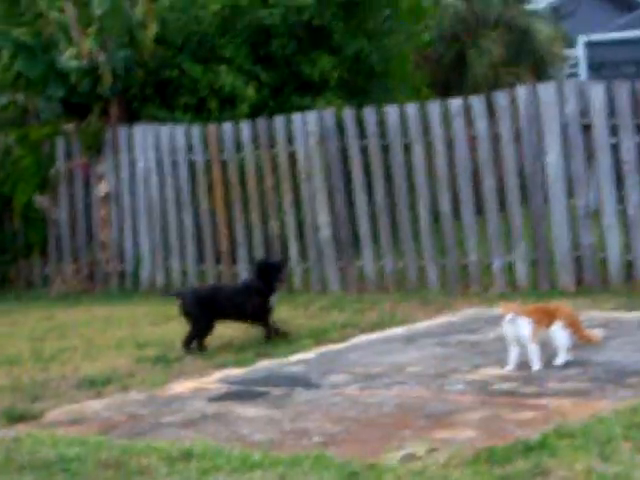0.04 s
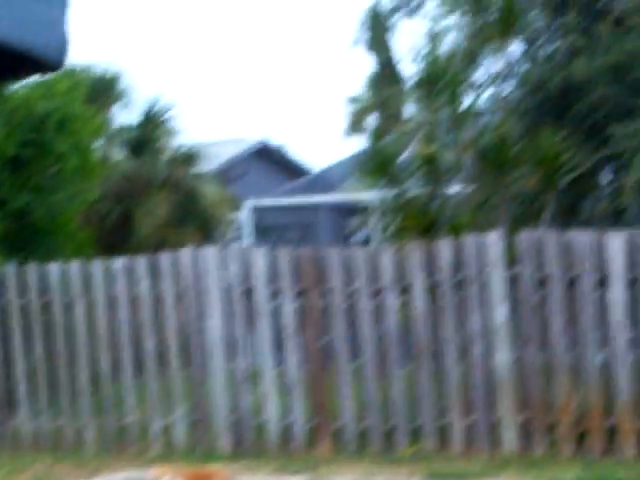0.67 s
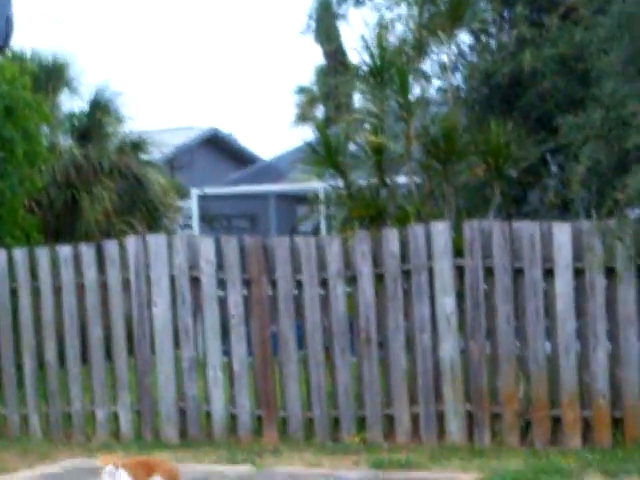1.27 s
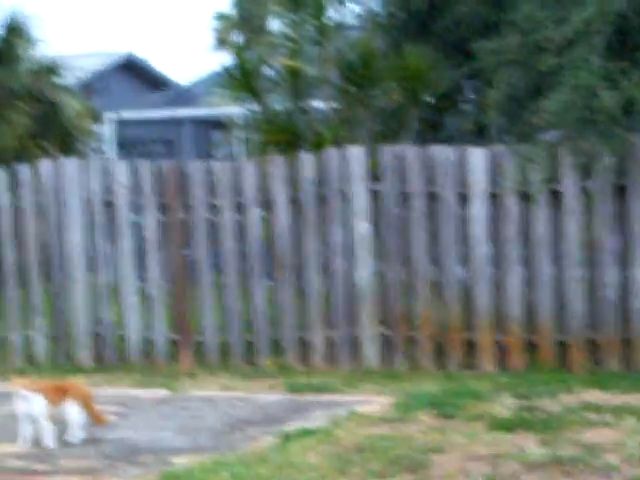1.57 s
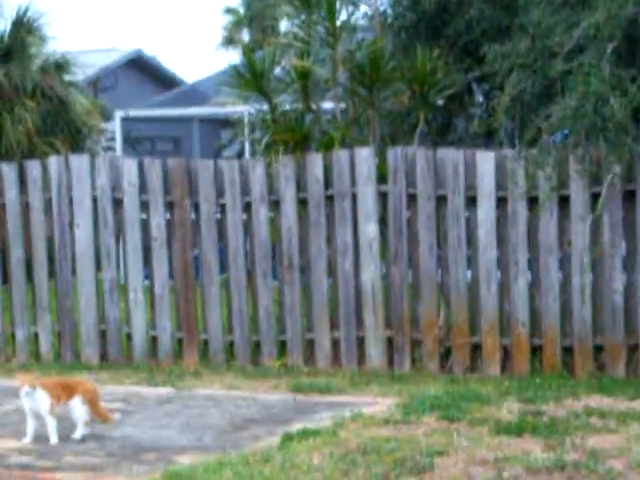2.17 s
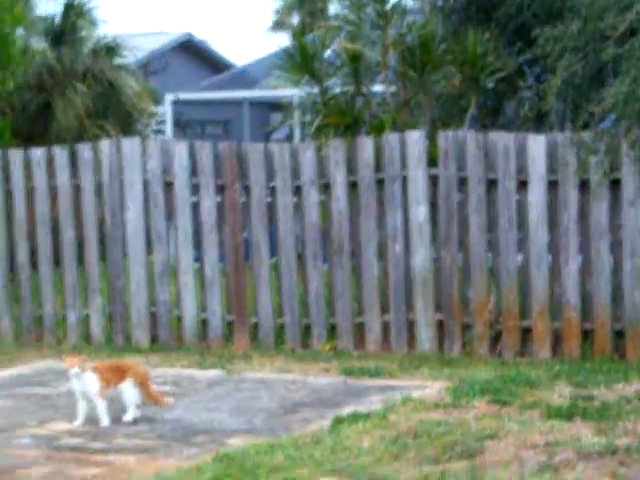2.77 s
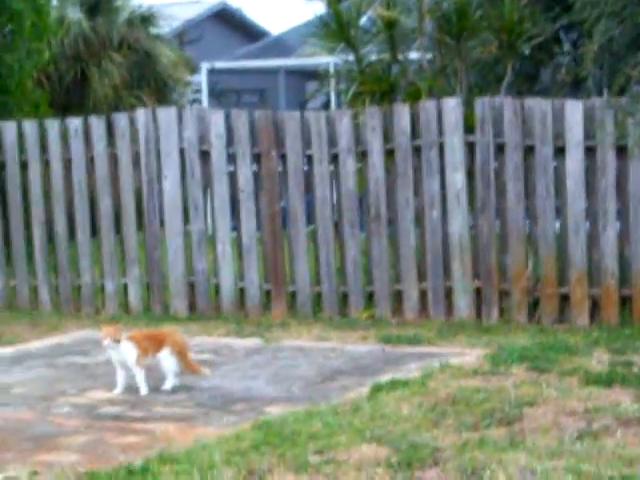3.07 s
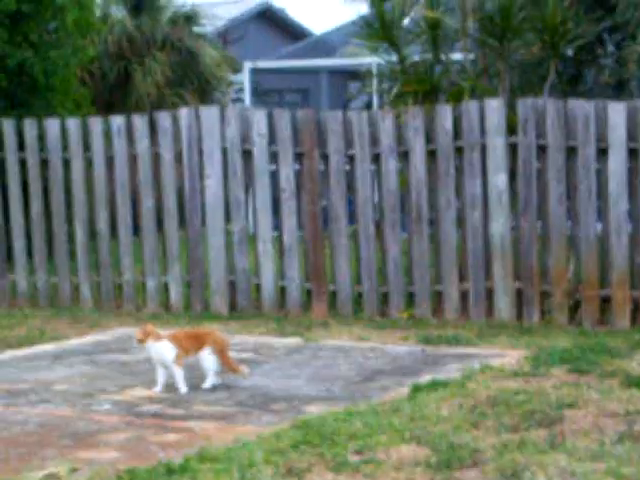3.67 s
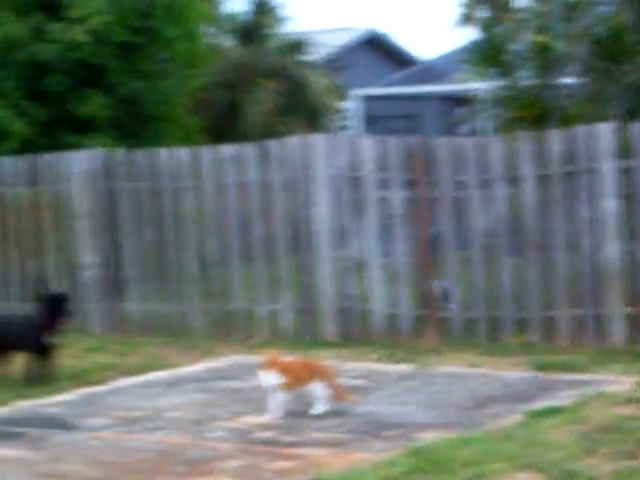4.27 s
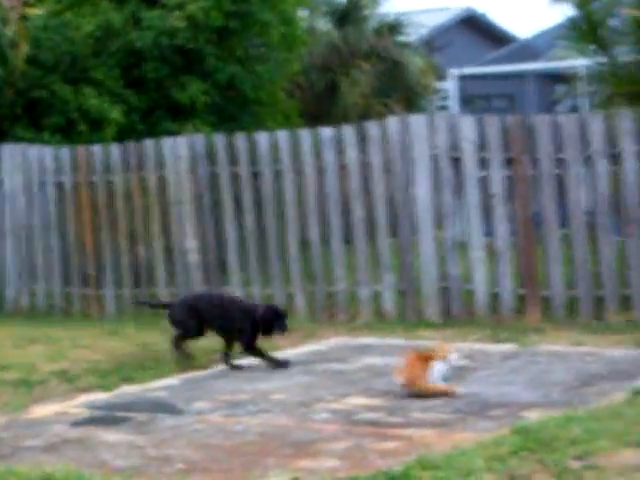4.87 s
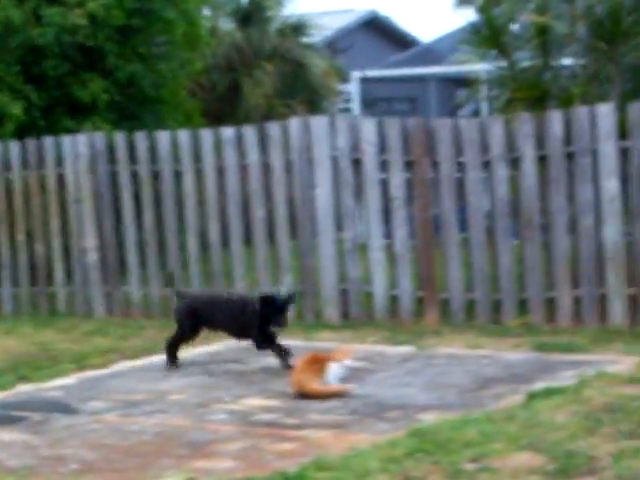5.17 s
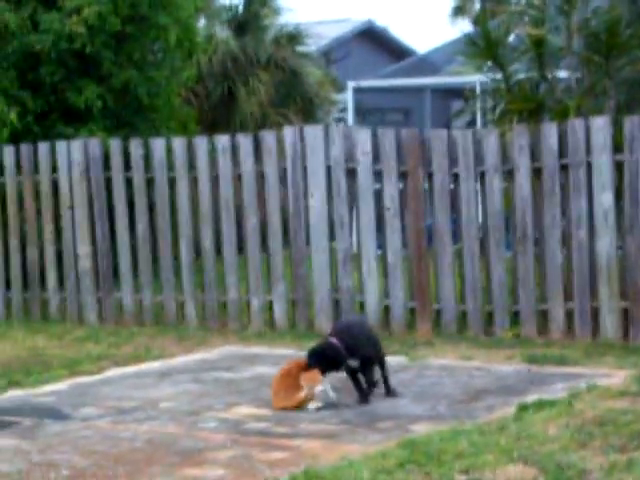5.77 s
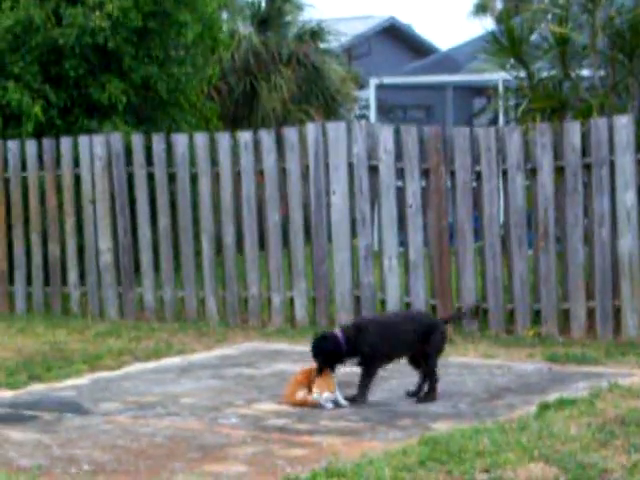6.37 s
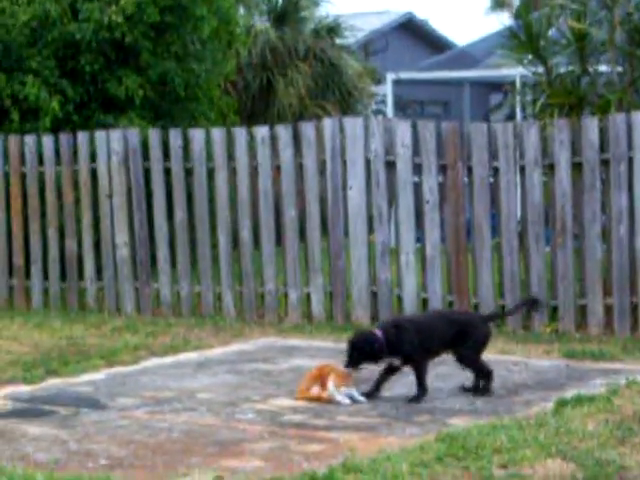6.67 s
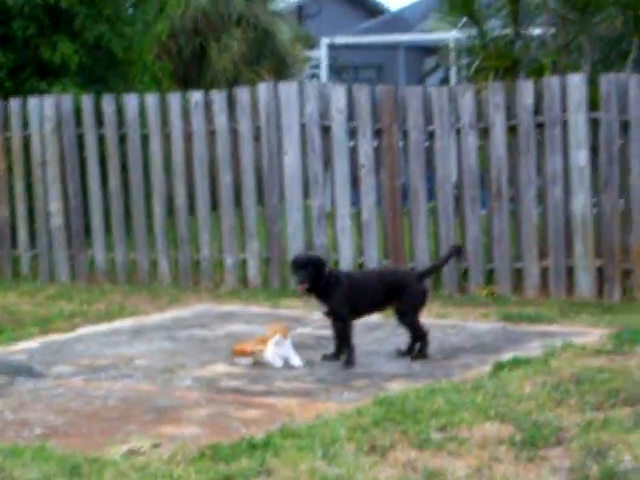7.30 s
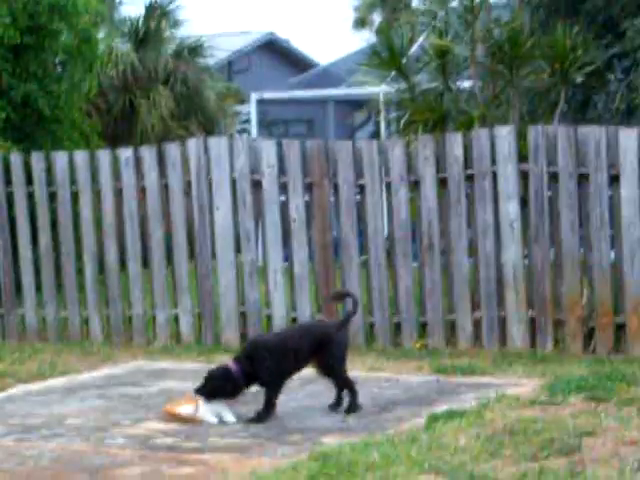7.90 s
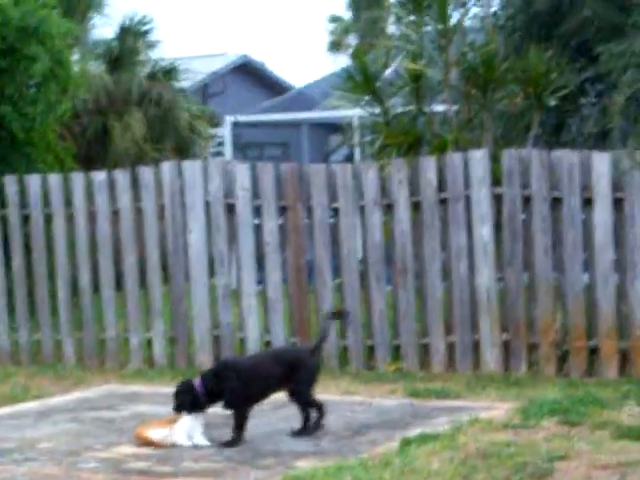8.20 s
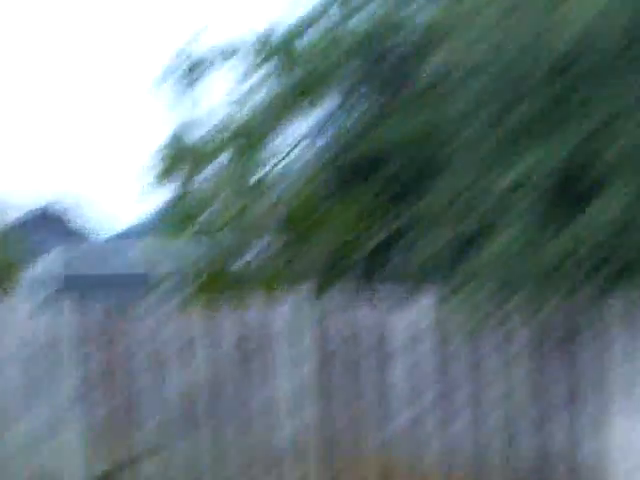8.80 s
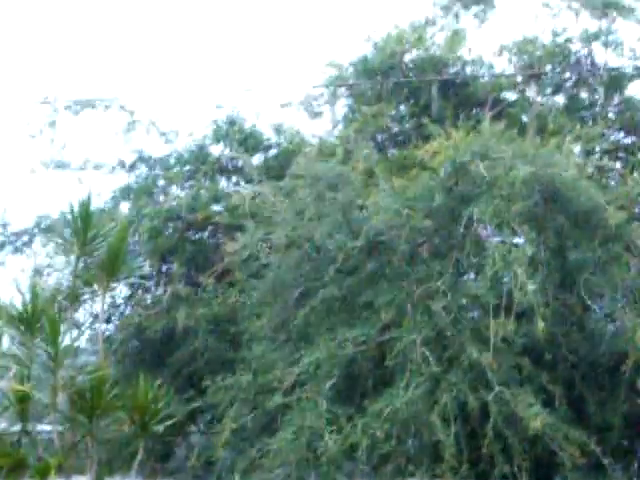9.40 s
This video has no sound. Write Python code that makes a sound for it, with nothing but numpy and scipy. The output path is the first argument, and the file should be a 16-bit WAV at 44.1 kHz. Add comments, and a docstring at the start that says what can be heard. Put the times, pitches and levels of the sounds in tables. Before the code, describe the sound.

In a quiet fenced yard, hoarse, down-slurred jay calls sound one after another, each with a short echo. The hand-held microphone picks up faint dull thumps throughout, with occasional puffs of wind and very brief motor whirrs. Around the middle a distant bird whistles once, very faintly, and a few small dry ticks follow. The jays then call more often, over a steady soft hush.

```python
"""A fenced backyard, heard from a small hand-held camera, with blue jays scolding in the trees around it.
Each jeer is an arched, down-slurred whistle, strongest on its fourth harmonic; most break into a rasp.
Ground, fence and houses throw the calls back over a quiet hush and the hum of a distant fan.
Right at the microphone are puffs of wind, soft thumps and tiny whirrs of the lens motor.
Midway a far bird whistles once, and a few dry ticks follow."""
import sys
import numpy as np
from scipy import signal
from scipy.fft import rfft, irfft, next_fast_len
from scipy.io import wavfile
from scipy.ndimage import map_coordinates

SR = 44100
rng = np.random.default_rng(int(sys.argv[2]) if len(sys.argv) > 2 else 0)


def wav_out(sig):
    """Save sig, one row per channel (or a flat mono array), as 16-bit PCM at SR to the path in sys.argv[1]."""
    wavfile.write(sys.argv[1], SR, np.round(np.clip(np.atleast_2d(sig).T, -1, 1) * 32767).astype(np.int16))


N = 416744
TIME = np.arange(N) / SR


def amp(db):
    """Decibels to gain."""
    return 10 ** (np.asarray(db) / 20)


def ramp(t, start, length):
    """Rises from zero to one over the given length."""
    return np.clip((t - start) / length, 0, 1)


def unit_rms(x):
    """Scales to an rms of one."""
    return x / np.sqrt(np.mean(x ** 2) + 1e-20)


def coloured(x, points):
    """Filters by a spectrum of (Hz, dB) points."""
    hz, db = np.transpose(points)
    size = next_fast_len(len(x))
    bins = np.fft.rfftfreq(size, 1 / SR)
    gain = amp(np.interp(np.log(bins + 1), np.log(hz + 1), db))
    return irfft(rfft(x, size) * gain, size)[:len(x)]


def noise(points, size):
    """Noise of unit rms with the given spectrum."""
    return unit_rms(coloured(rng.standard_normal(size), points))


def wander(t, rate_hz):
    """Smooth random motion of about unit size."""
    knots = rng.standard_normal(4096)
    return map_coordinates(knots, [(t - t[0]) * rate_hz * 2], order=3, mode="wrap")


def phase_of(hz):
    """Running phase in radians of a moving pitch."""
    return 2 * np.pi * np.cumsum(hz) / SR


def add(mix, s, sound):
    """Mixes a sound in at time s; what comes before time zero is dropped."""
    at = round(s * SR)
    sound = sound[max(-at, 0):]
    part = mix[max(at, 0):][:len(sound)]
    part += sound[:len(part)]


def jeer_pitch(t, crest_s, break_s, crest_hz, break_hz, roundness,
               flick_hz=150.4, flick_s=0.00402, scoop_hz=111.7, dive_hz_per_s=600):
    """A flick and a scoop up to the crest, a long slur down, and a dive after the voice breaks."""
    flick = flick_hz * np.exp(-t / flick_s)
    scoop = scoop_hz * (1 - ramp(t, 0, crest_s)) ** (1.85 * roundness ** 2)
    drop_hz, slur_s = crest_hz - break_hz, break_s - crest_s
    slur = drop_hz * ramp(t, crest_s, slur_s) ** roundness
    dive = (dive_hz_per_s + 0.6 * drop_hz / slur_s) * np.maximum(t - break_s, 0)
    return crest_hz - flick - scoop - slur - dive


# The body of a jay's voice, and its shrill top. Each row: harmonic number, relative level in dB.
BODY_HARMONICS = [(1, -40), (2, -23), (3, -18), (4, 0), (5, -24)]
TOP_HARMONICS = [(6, -2), (7, -4.5), (8, -6), (9, -10.5), (10, -14.5), (11, -26)]
# The throat, which damps a narrow band; the hoarse hiss round the top; the closing rasp.
# Each row: frequency in Hz, gain in dB.
THROAT_COLOUR = [(2500, 2.5), (4000, 1.5), (4400, -0.5), (4700, -14.5), (5050, -0.5), (5350, 1.5),
                 (5850, -6), (6400, 3), (7200, -1), (7800, -8)]
HOARSE_COLOUR = [(1200, -18), (2600, -9), (4000, -7.5), (4700, -11.5), (5300, -8), (7200, 8), (8500, -21)]
RASP_COLOUR = [(1200, -37.5), (1500, -13), (2000, -29.5), (2600, -12.5), (2850, -9.5), (3250, -6),
               (3600, -3.5), (4300, -10), (4650, -24.5), (5400, -16.5), (7000, -25), (8500, -30.5)]
def jeer(crest_s, break_s, crest_hz, break_hz, roundness, hold_db, swell_db, overtone_db, rasp_db,
         swell_s=0.096, crack_s=0.036, rasp_s=0.1, rattle_hz=200, attack_s=0.012, cut_s=0.018):
    """One jay in the branches: a hoarse tone swells and holds, then breaks, shakes and rattles."""
    t = np.arange(0, break_s + rasp_s, 1 / SR)
    hz = jeer_pitch(t, crest_s, break_s, crest_hz, break_hz, roundness)
    broken = ramp(t, break_s - crack_s / 2, crack_s)
    release = ramp(t, break_s, rasp_s)
    below_full_db = swell_db * (1 - ramp(t, 0, swell_s))
    body_db = hold_db - below_full_db - 6 * broken - 3.5 * release + 1.38 * wander(t, 45)
    top_db = overtone_db - 0.79 * below_full_db - 4 * release
    rasp_gain = amp(rasp_db) * broken
    roughness = np.minimum(rasp_gain, 1)
    jitter = (0.0026 + 0.0088 * roughness) * wander(t, 250)
    phase = phase_of(hz * (1 + jitter))
    # the voice starts an octave up: the odd harmonics swell in as its period doubles
    doubled = ramp(t, 0, 0.03) ** 2
    tone = amp(top_db - 13) * noise(HOARSE_COLOUR, len(t))
    for harmonics, level_db in ((BODY_HARMONICS, body_db), (TOP_HARMONICS, top_db)):
        for k, db in harmonics:
            # all but the fourth fade in and out along the many paths among the branches
            depth = 0.48 * (k != 4)
            paths = (1 + depth * (wander(t, 20) + 1j * wander(t, 20))) / np.sqrt(1 + 2 * depth ** 2)
            partial = (paths * np.exp(1j * k * phase)).imag
            throat_db = np.interp(k * hz, *np.transpose(THROAT_COLOUR))
            tone += amp(level_db + db + throat_db) * doubled ** (k % 2) * partial
    tone *= amp(-0.06 * np.maximum(720 - hz, 0))  # the tone weakens as the pitch sinks below 720 Hz
    rattle = 0.16 * np.sin(phase_of(rattle_hz * (1 + 0.2 * wander(t, 40))))
    rasp = amp(body_db) * rasp_gain * unit_rms((1 + rattle) * noise(RASP_COLOUR, len(t)))
    voice = (tone * (1 + rattle * roughness) + rasp) / np.sqrt(1 + rasp_gain ** 2)
    return voice * ramp(t, 0, attack_s) * ramp(t[-1] - t, 0, cut_s)


def ground_bounce(call, lag_ms, notch_hz, bounce_db=-8.5):
    """Adds the bounce off the ground, which by turns lifts and thins the tone as its pitch slides."""
    size = next_fast_len(len(call) + SR // 50)
    turns = (np.fft.rfftfreq(size, 1 / SR) - notch_hz) * lag_ms / 1000
    comb = 1 - amp(bounce_db) * np.exp(-2j * np.pi * turns)
    return irfft(rfft(call, size) * comb, size)


def wall_echo(call, spread_s=0.012):
    """The house wall returns a call as a short cluster of reflections."""
    t = np.arange(SR // 10) / SR
    cluster = rng.standard_normal(len(t)) * t * np.exp(-2 * t / spread_s)
    return signal.fftconvolve(call, cluster / np.linalg.norm(cluster))


# Jeers from the trees round the yard. Each row: start in seconds, times from there to the crest and to
# the break in seconds, pitches at the crest and at the break in Hz, roundness of the arch (under 1 is
# pointed), body level in dB, swell up to it in dB, top level in dB, rasp against the tone in dB,
# lag of the ground bounce in milliseconds, frequency it thins in Hz, wall echo in dB.
JEERS = [ (-.07, 0.077, .153, 913, 704, 1.4, -31.5, 3.2, -51.5, -3, 1.76, 3525, -7),
         (.265, .06, 0.27, 881, 778, 1.19, -37, 6, -50, 0.5, 4.9, 3364, -12.5),
         (1.596, 0.054, 0.25, 881, 751, 1.2, -35, 9.2, -51, -3, 3.83, 3262, -22),
         (2.85, 0.052, .24, 878, 767, 1.36, -36.5, 4.3, -52, -2, 3.65, 3452, -14.5),
         (4.452, .08, .262, 891.6, 785, 1.25, -36.5, 0.82, -50, 0, 3.48, 3600, -11.5),
         (6.154, 0.069, .292, 905, 721, .74, -32.5, 14, -47, -3.5, 1.55, 3100, -19),
         (6.503, 0.048, 0.25, 893, 790.4, .95, -35.5, 0.84, -50, 8.5, 1.46, 3350, -11.5),
         (7.128, .073, .254, 900, 770.5, 1.23, -33.5, 9.3, -47, 0, 3.4, 3365, -17),
         (8.495, 0.08, .27, 902.6, 775, 1.26, -34, 10.2, -45.5, 4, 3.68, 3371, -13),
         (8.92, .06, .235, 940, 712, 0.67, -35, 4.2, -49, -7, 1.24, 3620, -25),
         (9.267, .08, 0.25, 889, 781, 1.16, -34.5, 9, -45.5, -15, 1.59, 3625, -25), ]
def jays(wall_delay_s=0.073):
    """Each call reaches the microphone directly, off the ground, and later off the house."""
    calls = np.zeros(N)
    for start, *voice, lag_ms, notch_hz, wall_db in JEERS:
        call = jeer(*voice)
        add(calls, start, ground_bounce(call, lag_ms, notch_hz))
        add(calls, start + wall_delay_s, amp(wall_db) * wall_echo(call))
    return calls


# Echoes off the fence and trees. Each row: delay in seconds, level against the call in dB.
YARD_ECHOES = [(.01, -14), (.024, -17.5), (.047, -28.5), (.104, -19.5)]
# What the yard scatters back. Each row: frequency in Hz, gain in dB.
YARD_COLOUR = [(1500, 4.5), (3300, 3.5), (4400, -0.5), (5500, 4), (8000, -24.5)]
def yard(calls, scatter_db=-17, t60_s=0.6, build_s=0.042):
    """Adds a few distinct echoes and a tail scattered by leaves and boards."""
    t = np.arange(SR) / SR
    tail = noise(YARD_COLOUR, SR) * amp(-60 * t / t60_s) * ramp(t, 0, build_s) ** 2
    response = amp(scatter_db) * tail / np.linalg.norm(tail)
    for delay, db in YARD_ECHOES:
        add(response, delay, amp([db]))
    return calls + signal.fftconvolve(calls, response)[:N]


# The quiet air all round the microphone. Each row: frequency in Hz, relative density in dB.
HUSH_COLOUR = [(12, -39.5), (20, 1.5), (54, -3), (198, -12.5), (243, -13.5), (290, -16), (639, -17),
               (845, -20), (1680, -26), (3260, -29.5), (4660, -33.5), (5420, -32), (7180, -32), (7750, -31),
               (8800, -55.5), (11400, -85), (19400, -120)]
def hush(level_db=-50):
    """Nearly steady outdoor air and hiss."""
    return amp(level_db + 0.2 * wander(TIME, 1.8)) * noise(HUSH_COLOUR, N)


def distant_fan(hum_hz=234.1, level_db=-66.5):
    """A fan a long way off hums on one tone, wavering in pitch and level."""
    phase = phase_of(hum_hz * (1 + 0.02 * wander(TIME, 8)))
    return amp(level_db) * unit_rms((1 + 0.26 * wander(TIME, 4)) * np.sin(phase))


# Wind on the microphone. Each row: time of the peak in seconds, level in dB, half length in seconds.
WIND_PUFFS = [(0.17, -35, 0.03), (0.324, -43.5, .06), (0.428, -39.5, 0.027), (1.027, -49.5, 0.071),
              (1.55, -46, 0.073), (5.33, -46, 0.023), (7.29, -43.5, 0.038), (7.429, -34, 0.032),
              (7.513, -44.5, 0.086), (8.978, -43.5, 0.048), (9.153, -44, 0.045)]
# Its rumble. Each row: frequency in Hz, gain in dB.
WIND_COLOUR = [(15, -7), (40, 0.5), (90, 0.5), (140, -6), (220, -16), (450, -32.5), (1200, -32.5),
               (3000, -81.5)]
def wind():
    """Low turbulence right at the microphone swells with each puff."""
    strength = sum(amp(db) * np.exp(-0.5 * ((TIME - s) / half) ** 2) for s, db, half in WIND_PUFFS)
    return strength * noise(WIND_COLOUR, N)


# The stronger dull thumps in the microphone.
# Each row: start in seconds, strength of the push in dB, its length in seconds.
THUMPS = [(.227, -32.5, 0.009), (0.59, -33.5, 0.012), (.762, -34.5, .013), (.859, -35.5, 0.018),
          (.956, -37, 0.012), (1.055, -31, 0.014), (1.165, -36.5, 0.02), (1.226, -35.5, 0.0088),
          (1.255, -28.5, 0.0038), (1.284, -33, .015), (1.395, -32.5, 0.014), (1.508, -32.5, 0.021),
          (1.923, -36.5, .012), (2.126, -33.5, 0.0066), (2.185, -36.5, .011), (2.299, -37.5, 0.013),
          (2.327, -30.5, 0.0052), (2.503, -32, 0.016), (2.827, -34.5, 0.014), (3.156, -36.5, 0.016),
          (3.497, -32, 0.017), (3.7, -36.5, 0.018), (3.829, -37.5, 0.0079), (4.16, -32.5, 0.016),
          (4.436, -37, .013), (4.586, -36, 0.014), (4.834, -35.5, .016), (4.995, -36.5, 0.018),
          (5.096, -37.5, .013), (5.195, -36.5, 0.016), (5.348, -38, .006), (5.408, -32.5, 0.012),
          (5.7, -36.5, 0.013), (5.828, -34, 0.016), (6.022, -33.5, 0.0043), (6.173, -35, 0.012),
          (6.37, -35.5, 0.015), (6.543, -37, 0.015), (6.834, -37, 0.02), (7.18, -35, 0.0146),
          (7.509, -32, 0.018), (7.778, -37.5, .012), (7.898, -34.5, 0.011), (8.224, -33.5, 0.014),
          (8.372, -38, 0.01), (8.492, -36.5, 0.016), (8.733, -36, 0.013), (8.903, -30, 0.0068),
          (9.126, -31.5, 0.0028), (9.324, -34, 0.015)]
def thumps(faint_per_s=1.5, faint_db=-46, faint_s=0.0111,
           rebound_s=0.013, slow_s=0.014, leak_hz=8, soft_hz=260):
    """Brief flat pushes, the quicker ones rebounding more; faint ones fall at random among the rest."""
    chance = rng.random((round(faint_per_s * N / SR), 2))
    faint = [(when * N / SR, faint_db, faint_s * (0.5 + size)) for when, size in chance]
    pressure = np.zeros(N)
    for start, db, length in THUMPS + faint:
        push = -np.ones(max(round(length * SR), 1))
        rebound = 1.2 * (1 - ramp(length, 0, slow_s)) * np.linspace(1, 0, round(rebound_s * SR))
        add(pressure, start, amp(db) * np.r_[push, rebound])
    # the microphone settles slowly and rounds the edges
    pressure = signal.lfilter(*signal.butter(1, leak_hz, "high", fs=SR), pressure)
    pressure = signal.lfilter(*signal.butter(1, soft_hz, fs=SR), pressure)
    return signal.lfilter(*signal.butter(2, 2 * soft_hz, fs=SR), pressure)


# The lens motor, in the same housing as the microphone.
# Each row: start in seconds, level in dB, length in seconds, level of the knock in dB.
LENS_WHIRRS = [(1.568, -52.5, 0.028, -47), (2.448, -57, 0.021, -55), (2.578, -56.5, 0.019, -58),
               (6.124, -53.5, 0.019, -46.5), (6.65, -54, 0.016, -47), (6.984, -54.5, .022, -62),
               (7.125, -48.5, 0.025, -58), (7.321, -47.5, 0.016, -47), (7.51, -58, 0.03, -52),
               (7.651, -55, 0.021, -54), (7.849, -54.5, 0.025, -46), (8.178, -56.5, 0.024, -53),
               (9.09, -40.5, 0.011, -75), (9.246, -47.5, .014, -73), (9.413, -47.5, 0.017, -70)]
# The motor's fizz and the housing's knock. Each row: frequency in Hz, gain in dB.
WHIRR_COLOUR = [(800, -20.5), (1300, -8), (2500, -9.5), (4600, -7), (5300, 0.5), (5900, -12.5), (7200, -6),
                (9000, -19.5)]
KNOCK_COLOUR = [(200, -21.5), (420, -13.5), (550, 9), (750, -0.5), (1200, -9), (2500, -42.5)]
def lens_motor(knock_decay_s=0.012):
    """The motor fizzes for a moment and knocks the housing halfway through."""
    fizz, knock = np.zeros(N), np.zeros(N)
    ring = np.exp(-TIME[:SR // 10] / knock_decay_s)
    for start, db, length, knock_db in LENS_WHIRRS:
        add(fizz, start, amp(db) * signal.windows.tukey(max(round(length * SR), 8), 0.3))
        add(knock, start + length / 2, amp(knock_db) * ring)
    return fizz * noise(WHIRR_COLOUR, N) + knock * noise(KNOCK_COLOUR, N)


# The course of a far bird's whistle. Each row: time in seconds, pitch in Hz, level in dB.
FAR_WHISTLE = [(3.72, 3000, -76), (3.77, 3090, -69), (3.83, 2550, -66), (3.9, 2330, -67), (3.93, 2300, -78)]
def far_bird():
    """One nearly pure slur, faint with distance."""
    s, hz, db = np.transpose(FAR_WHISTLE)
    phase = phase_of(np.interp(TIME, s, hz) * (1 + 0.0046 * wander(TIME, 90)))
    return amp(np.interp(TIME, s, db, left=-150, right=-150)) * np.sin(phase)


# Small dry ticks, like claws on concrete. Each row: start in seconds, level in dB.
TICKS = [(4.498, -59), (4.562, -45), (4.627, -60), (5.203, -53), (5.536, -53), (5.565, -50.5), (5.584, -53),
         (5.6, -50), (5.697, -49), (5.772, -56), (5.82, -53), (5.892, -52.5)]
# Their brightness. Each row: frequency in Hz, gain in dB.
TICK_COLOUR = [(1000, -17), (2500, 1.5), (4500, -3), (5500, 6), (7200, -1), (9000, -22)]
def ticks(decay_s=0.0046):
    """Bright clicks of noise with hardly any ring."""
    envelope = np.zeros(N)
    for start, db in TICKS:
        add(envelope, start, amp(db) * np.exp(-TIME[:SR // 20] / decay_s))
    return envelope * noise(TICK_COLOUR, N)


def scene():
    """The jays out in the yard and the small noises near and far, at one microphone."""
    mix = yard(jays()) + hush() + distant_fan() + wind() + thumps() + lens_motor() + far_bird() + ticks()
    return mix[None]


def record(dry, camera_rate_hz=16000, edge_hz=8950):
    """The camera dulls the treble, mirrors it upward with its low sample rate, and cuts off the top."""
    sound = coloured(dry[0], [(7400, 0.0048), (8200, -9), (9000, -18)])
    mirror = 2 * amp(-9) * np.cos(2 * np.pi * camera_rate_hz * TIME) * sound
    mirror = coloured(mirror, [(7000, -39.5), (8000, 10.5), (9000, -24.5)])
    low_pass = signal.firwin(401, edge_hz, window=("kaiser", 9), fs=SR)
    return signal.oaconvolve(sound + mirror, low_pass, "same")[None]


dry = scene()
out = record(dry)
wav_out(out)
```